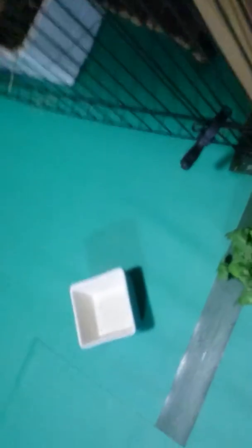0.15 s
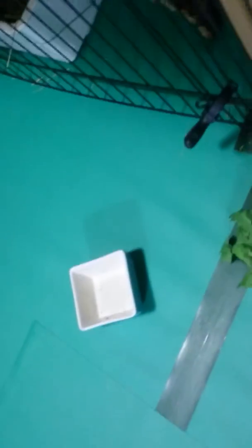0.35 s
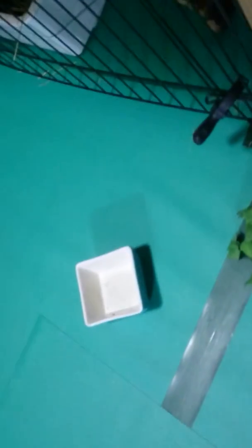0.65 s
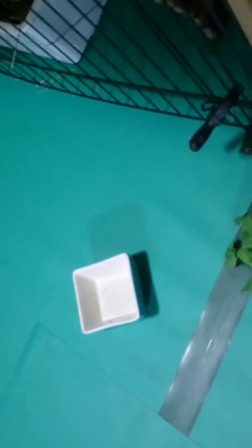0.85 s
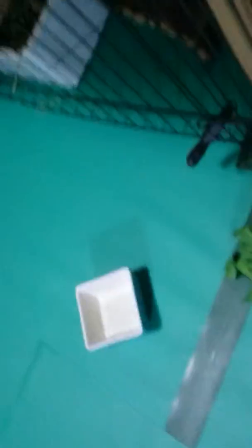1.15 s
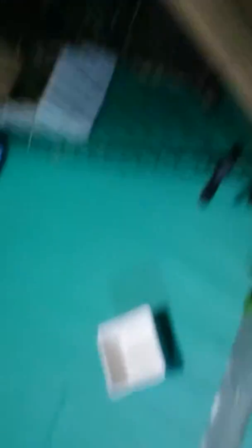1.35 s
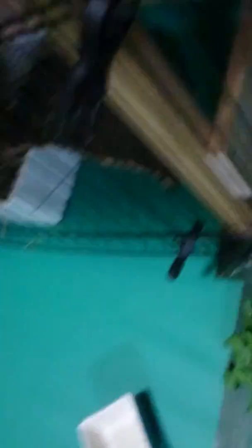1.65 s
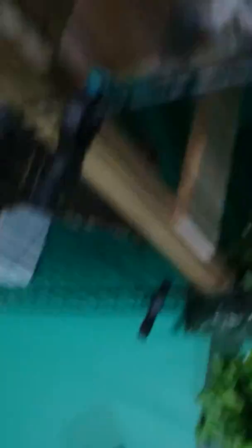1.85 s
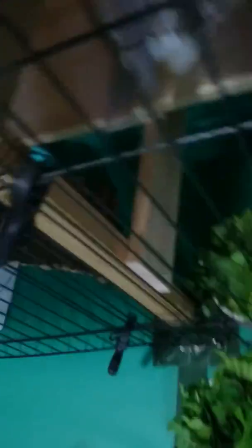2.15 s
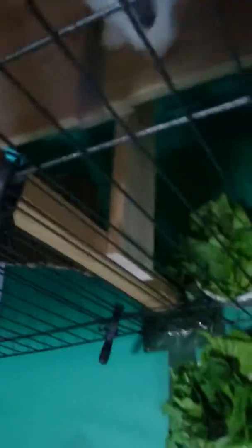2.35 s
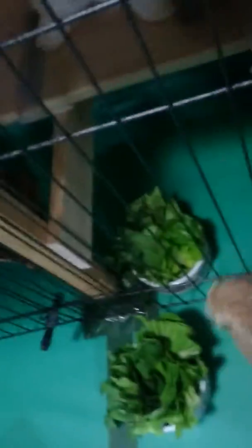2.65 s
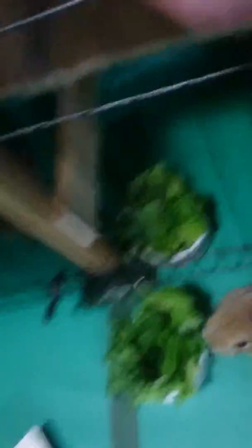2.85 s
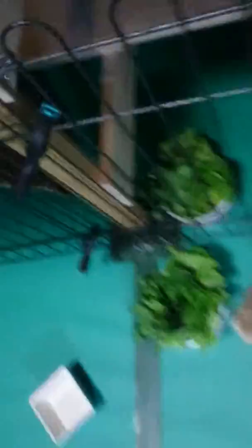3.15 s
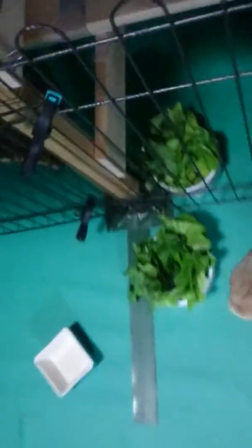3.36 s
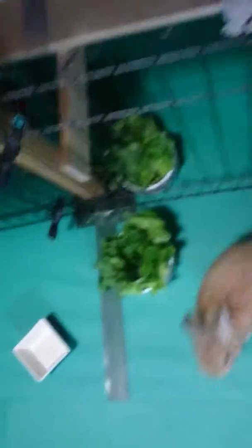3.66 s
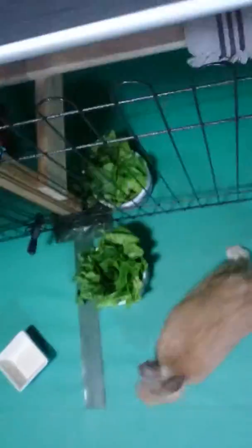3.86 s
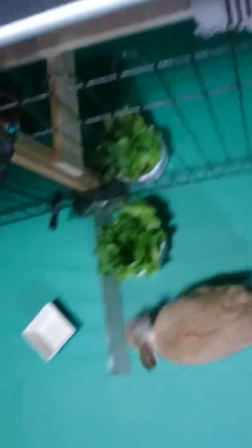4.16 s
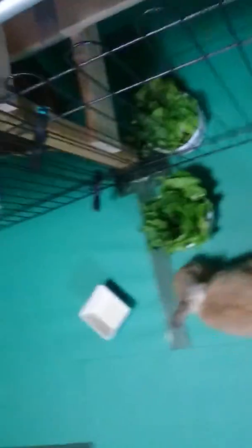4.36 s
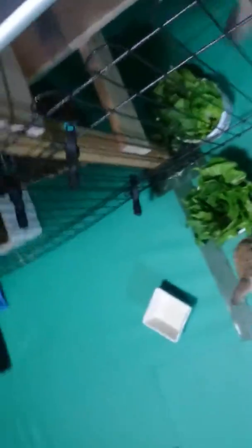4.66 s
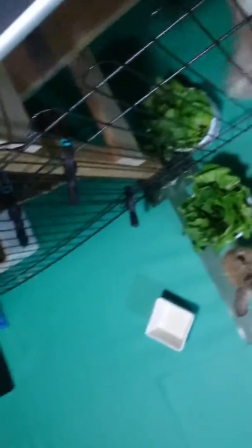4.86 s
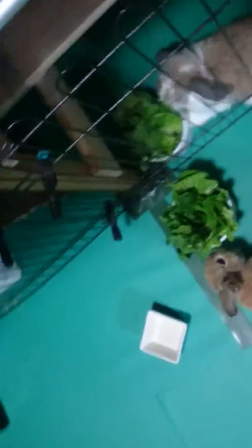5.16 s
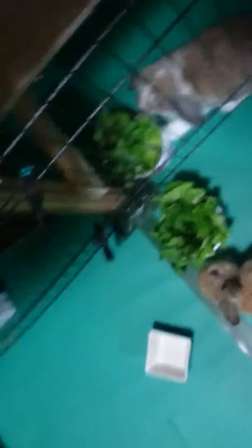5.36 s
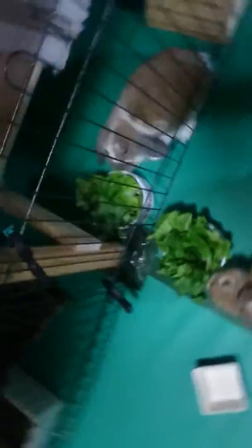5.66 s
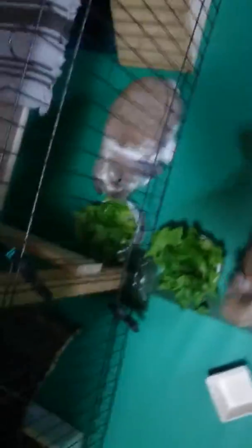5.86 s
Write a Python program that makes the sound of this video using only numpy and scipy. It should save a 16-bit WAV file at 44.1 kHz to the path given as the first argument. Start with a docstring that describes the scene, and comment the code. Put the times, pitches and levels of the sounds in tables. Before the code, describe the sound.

A rustle and one loud hollow plastic knock, then scattered crisp ticks, leafy scuffs and a faint squeak over quiet room hum.

```python
"""A hollow knock, small taps, scuffing paws and leaves, a soft rustle and a thin squeak, over room tone and hum.
Rabbits hop and nibble in a wire pen on a foam mat, heard by a hand-held phone in a quiet room.
Knock, taps, scuffs and thuds are bursts ringing through resonances; rustle is fine grit that swells and fades.
Room tone is shaped noise, hum is sine tones and narrow noise, and the squeak is a gliding sine.
"Shared" sound is alike at both ports (microphone openings); "opposed" sound has its sign flipped at the right."""
import sys
import numpy as np
from scipy import signal
from scipy.fft import rfft, irfft
from scipy.io import wavfile
from scipy.ndimage import uniform_filter1d

SR = 44100
rng = np.random.default_rng(int(sys.argv[2]) if len(sys.argv) > 2 else 0)


def file_out(sig):
    """Save sig as 16-bit WAV at sys.argv[1]."""
    # one column per channel
    cols = np.atleast_2d(sig).T
    # limit, then scale
    lim = np.clip(cols, -1, 1)
    pcm = np.round(lim * 32767).astype(np.int16)
    wavfile.write(sys.argv[1], SR, pcm)


N = 264820
T = np.arange(N) / SR  # time in s
SIDES = np.array([[.5], [-.5]])  # left and right port: times a dB difference, gives each port its half

# course of the background: t/s, mean level of the shared room tone/dB, mean level of the motor's lowest hum/dB
BACKGROUND = [(0.0, -58.5, -59), (0.5, -56.5, -63), (0.7, -55.5, -61), (0.9, -59, -64), (1.8, -57, -63),
              (2.1, -57.5, -67), (3.0, -57.5, -73), (3.56, -59.5, -72), (4.4, -58.5, -69), (5.0, -59, -70),
              (5.6, -59.5, -73), (6.0, -57, -75)]


def undb(db):
    """Turn decibels into a plain gain."""
    return 10 ** (np.asarray(db) / 20)


def unit(x):
    """Scale to an RMS level of 1."""
    return x / np.sqrt(np.mean(x ** 2))


def ring(x, hz, width_hz):
    """One resonance, gain 1 at the centre."""
    b, a = signal.iirpeak(hz, hz / width_hz, fs=SR)
    return signal.lfilter(b, a, x)


def steep(x, hz, width_hz):
    """The same resonance passed twice, so sound away from its centre falls off faster."""
    return ring(ring(x, hz, width_hz), hz, width_hz)


def coloured(points):
    """Noise whose spectrum follows (f/Hz, level/dB) points."""
    hz, db = np.transpose(points)
    f = np.maximum(np.fft.rfftfreq(N, 1 / SR), 1)
    gain = undb(np.interp(np.log(f), np.log(hz), db))
    return irfft(rfft(rng.standard_normal(N)) * gain, N)


def walk(rate):
    """Random levels drawn `rate` times a second and joined by straight ramps; spread a little under 1."""
    k = int(SR / rate)
    steps = np.repeat(rng.standard_normal(N // k + 1), k)
    return uniform_filter1d(steps, k)[:N]


def grit(n, spread_db, grain_s):
    """Dense tiny slips: noise whose size jumps from grain to grain, alike at both ports."""
    k = max(int(grain_s * SR), 1)
    size_db = spread_db * np.minimum(rng.exponential(size=n // k + 1), 3)
    size = np.repeat(undb(size_db), k)[:n]
    return unit(rng.standard_normal((2, n)) * size)


def fade(t, t60):
    """Decay by 60 dB in t60 seconds, starting at t = 0."""
    return 1000. ** (-np.maximum(t, 0) / t60)


def swell(start, rise, hold, t60):
    """Rise, hold and fade over the whole scene."""
    return np.clip((T - start) / rise, 0, 1) * fade(T - start - rise - hold, t60)


def add(out, start, x):
    """Mix a burst into a layer at its start time in s."""
    i = int(start * SR)
    out[:, i:i + x.shape[-1]] += x[..., :N - i]


def ports(shared, opposed):
    """Left port hears the sum, right port the difference."""
    return np.array([shared + opposed, shared - opposed])


def room_tone():
    """Shaped noise of slowly wandering level, one part shared by the ports and one opposed."""
    # spectra of the two parts, only their shape counts: f/Hz, relative level/dB
    shared_shape = [(24, -8), (40, -15), (55, -4), (95, -10.5), (140, -12.5), (240, -15), (400, -10),
                    (620, -8), (780, -3), (1200, 0), (2050, 1), (2700, -6), (3830, -8.5), (4340, -17),
                    (6490, -12), (16000, -38.5)]
    opposed_shape = [(18, -28), (30, -4), (59, -7), (141, -13), (240, -6.5), (300, -8), (364, -4.5),
                     (486, -9.5), (620, -5.5), (2230, -8.5), (4530, -22.5), (6900, -21.5), (16000, -45)]
    start, level_db, _ = np.transpose(BACKGROUND)
    gain = undb(np.interp(T, start, level_db) + 1.84 * walk(7.1))
    shared = gain * unit(coloured(shared_shape))
    opposed = gain * unit(coloured(opposed_shape)) * undb(1.5)
    return ports(shared, opposed)


def hum_lines(turns, lines):
    """Sine tones at multiples of one turning rate, each wavering in level on its own."""
    shared, opposed = np.zeros(N), np.zeros(N)
    for multiple, first_db, last_db, shared_db in lines:
        level_db = first_db + (last_db - first_db) * T / T[-1] + 1.5 * walk(2.68)
        wave = np.sin(2 * np.pi * (multiple * turns + rng.random()))
        tone = undb(level_db) * unit(wave)
        shared = shared + undb(shared_db) * tone
        opposed = opposed + tone
    return ports(shared, opposed)


def mains_hum():
    """Multiples of a steady mains tone, changing slowly as the phone is carried."""
    # multiple of the mains tone, mean opposed level at start/dB, at end/dB, shared part relative to opposed/dB
    mains_lines = [(2, -72, -79, -12), (4, -75, -76.5, -11.5), (6, -79.5, -77, -8), (8, -72, -95, -13),
                   (10, -95, -77, -1)]
    mains_hz = 49.93
    return hum_lines(mains_hz * T, mains_lines)


def motor_hum():
    """A small motor whose speed drifts a little: one opposed low tone and its multiples."""
    # multiple of the motor tone, mean opposed level at start/dB, at end/dB, shared part relative to opposed/dB
    motor_lines = [(2, -80, -76, -15), (4, -84, -76, -14.5), (6, -75.5, -88, -12.5), (8, -86, -80.5, -3)]
    motor_hz = 54.8
    turns = motor_hz * (T + np.cumsum(0.0018 * walk(3)) / SR)
    start, _, level_db = np.transpose(BACKGROUND)
    gain = undb(np.interp(T, start, level_db) + 1.2 * walk(6))
    lowest = gain * unit(np.sin(2 * np.pi * turns))
    return ports(0, lowest) + hum_lines(turns, motor_lines)


def upper_hum():
    """Narrow bands of noise that come and go together."""
    # bands: f/Hz, opposed level before the swells/dB, shared part relative to opposed/dB, width/Hz
    hum_bands = [(383, -72.5, -0.5, 24), (438, -73.5, 4.5, 14), (497, -75.5, 1.5, 30)]
    # swells: t at the end of the rise/s, level relative to the bands' level/dB
    hum_swells = [(0.02, 1), (0.62, -1.5), (1.8, 0), (2.0, -8), (2.46, -5), (2.85, -5), (3.35, -9),
                  (3.8, -3.5), (4.0, -11), (4.92, -14), (5.6, -3)]
    rise_s, fade_t60_s = 0.045, 0.4
    strength = undb(-19.5)  # what is left between swells
    for peak_s, swell_db in hum_swells:
        strength = strength + undb(swell_db) * swell(peak_s - rise_s, rise_s, 0, fade_t60_s)
    shared, opposed = np.zeros(N), np.zeros(N)
    for hz, db, shared_db, width_hz in hum_bands:
        tone = undb(db) * strength * unit(ring(rng.standard_normal(N), hz, width_hz))
        shared = shared + undb(shared_db) * tone
        opposed = opposed + tone
    return ports(shared, opposed)


def crackle(bands):
    """Fine grit in fixed bands, each crackling on its own."""
    layers = [undb(db) * steep(grit(N, 2.34, 0.0048), hz, width_hz) for hz, width_hz, db in bands]
    return unit(sum(layers))


def rustle():
    """Hay and cloth stir over a faint rustle that never stops; body and treble swell separately, powers add."""
    # bands of the body and of the treble: f/Hz, width of one filter pass/Hz, relative level/dB
    body_bands = [(3270, 1500, -2.5), (5500, 1850, -1), (6480, 2000, 0.5), (7870, 3850, -5.5)]
    treble_bands = [(8800, 8100, 0.5), (12700, 3500, -4.5), (15250, 2400, 4)]
    # stirrings: t/s, rise/s, hold/s, fade t60 of the body/s, level of the body/dB,
    # treble relative to body/dB, left minus right/dB
    stirrings = [(0.0, 0.00085, 0.011, 0.49, -54, 1, 3), (0.026, 0.013, .012, .2, -56, 0, 0),
                 (0.076, 0.011, .02, 0.82, -56, 1, 2), (0.145, 0.017, .01, .28, -55.5, -2, 2),
                 (0.223, 0.038, 0.0056, 0.35, -49.5, -5, 4), (0.283, 0.037, .04, 1.08, -50.5, -1.5, 2.5),
                 (0.561, 0.01, 0.0041, 0.51, -53, -4.5, 0), (0.618, .004, 0.011, .6, -54.5, -2, 1),
                 (0.651, 0.021, 0.085, 0.34, -55, 2, 0), (0.918, 0.023, 0.005, 0.19, -63.5, -3, -2),
                 (1.22, 0.22, 0.27, 0.5, -64, -3, 1.5), (1.843, 0.054, 0.62, 1.1, -72, -27, -3),
                 (2.12, 0.2, 0.01, 0.7, -58.5, -1.5, 4), (2.447, 0.008, 0.011, 0.39, -57, -3.5, -1),
                 (2.598, 0.01, 0.011, 0.15, -61, -9, -6), (4.312, 0.014, 0.018, 0.5, -55.5, -12, -3),
                 (4.527, 0.033, 0.072, 0.27, -54, -6.5, -1.5), (4.763, 0.011, 0.018, 0.86, -63, 0.5, -2.5),
                 (4.815, 0.14, 0.01, 0.3, -58, -1.5, -2), (5.04, 0.019, 0.032, 0.45, -62, -4, -2),
                 (5.617, 0.015, 0.013, 0.46, -67.5, 10, -5), (5.754, 0.019, 0.005, 0.25, -57.5, 0.5, -0.5),
                 (5.848, 0.035, 0.019, 0.4, -60, -0.5, 1)]
    treble_fade_share = 0.61  # the treble of a stirring dies sooner
    body = crackle(body_bands)
    treble = crackle(treble_bands)
    # the faint rustle flickers by about 1 dB, its treble lies 13.5 dB lower
    body_power = undb(-67.5 - walk(13)) ** 2
    treble_power = body_power * undb(-13.5 - walk(9)) ** 2
    for start, rise, hold, t60, db, treble_db, pan_db in stirrings:
        port_db = db + SIDES * pan_db
        body_swell = swell(start, rise, hold, t60) * undb(port_db)
        treble_swell = swell(start, rise, hold, treble_fade_share * t60) * undb(port_db + treble_db)
        body_power = body_power + body_swell ** 2
        treble_power = treble_power + treble_swell ** 2
    return np.sqrt(body_power) * body + np.sqrt(treble_power) * treble


def squeak():
    """A thin arching tone: a sine whose pitch glides and trembles slightly, opposed at the ports."""
    # glide: t/s, mean f/Hz, peak level/dB
    glide = [(2.8, 8300, -90), (2.85, 9300, -78), (2.9, 9450, -72), (2.95, 9500, -66), (2.97, 9650, -78),
             (3.0, 9500, -75), (3.03, 9100, -76), (3.06, 8100, -85)]
    start, hz, db = np.transpose(glide)
    pitch_hz = np.interp(T, start, hz) * (1 + .002 * walk(200))
    tone = np.sin(2 * np.pi * np.cumsum(pitch_hz) / SR)
    gain = undb(np.interp(T, start, db, left=-200, right=-200))  # silent before and after
    return ports(0, tone * gain)


def thuds():
    """Knock and hops felt low: soft bumps of noise through one resonance, part opposed and part shared."""
    # t/s, opposed level before the fade/dB, f/Hz, width of one filter pass/Hz, fade t60/s,
    # shared part relative to opposed/dB
    bumps = [(0.608, -46, 527, 90, 0.14, -3), (0.612, -44, 320, 220, 0.18, -13.5),
             (0.79, -55, 378, 60, 0.37, -7), (1.68, -63, 406, 120, 0.34, -1.5),
             (1.781, -52, 170, 200, 0.56, -22), (1.788, -60, 345, 60, 0.28, -9),
             (2.457, -46, 670, 120, 0.2, -5), (2.458, -57, 460, 90, 0.22, -5),
             (3.26, -63.5, 413, 80, 0.4, -2), (4.998, -63, 105, 90, .2, -5), (1.84, -59, 70, 60, 0.27, -8),
             (5.485, -68, 720, 250, 0.12, 10), (5.5, -59.5, 150.4, 151, 0.29, -11),
             (5.615, -58.5, 710, 200, 0.41, -2)]
    out = np.zeros((2, N))
    t = np.arange(int(.4 * SR)) / SR
    for start, db, hz, width_hz, t60, shared_db in bumps:
        shared = unit(steep(rng.standard_normal(len(t)), hz, width_hz))
        opposed = unit(steep(rng.standard_normal(len(t)), hz, width_hz))
        shape = fade(t, t60) * np.clip(t / 0.0056, 0, 1)
        add(out, start, undb(db) * shape * ports(undb(shared_db) * shared, opposed))
    return out


def fibres(n, hz, width_hz):
    """Five neighbouring fibres that slip and ring each on its own, spread around one frequency."""
    places = np.linspace(-.5, .5, num=5) + 0.094 * rng.standard_normal(5)
    fibre_hz = hz + 0.66 * places * width_hz
    return unit(sum(steep(grit(n, 3.6, .0012), f, 0.68 * width_hz) for f in fibre_hz))


def scuffs():
    """Paws and leaves on the mat: stick-slip grit rings mat and leaf while the contact lasts, then fades."""
    # t/s, rise/s, hold/s, fade t60/s, level of the high ring/dB, low ring f/Hz, low width scale/Hz,
    # low relative to high/dB, high ring f/Hz, high width scale/Hz, treble relative to high/dB, left minus right/dB
    contacts = [(1.775, 0.009, 0.02, 0.4, -51, 2680, 2860, 2, 6300, 2780, -8, 1.5),
                (3.054, 0.011, 0.012, 0.2, -52, 2350, 2200, 2, 5700, 2510, -26, 0.5),
                (3.331, 0.0031, 0.012, .1, -53, 3000, 1000, -15, 6130, 1200, -29, -1),
                (4.143, 0.0068, 0.0064, 0.13, -49.5, 3030, 1000, -14, 6630, 3000, -14, -2),
                (4.292, 0.0048, 0.0064, 0.15, -49, 3100, 1000, -7, 6400, 600, -24, -2),
                (4.299, 0.01, 0.01, 0.14, -51, 2060, 600, 1.5, 6100, 3060, -17, -2),
                (4.476, 0.007, 0.045, 0.14, -50.5, 2190, 350, 2.5, 6500, 2220, -19, -5),
                (4.496, 0.017, 0.014, 0.072, -44, 2210, 220, -0.5, 5850, 1400, -16, 0.5),
                (4.479, 0.028, 0.03, 0.14, -59.5, 3070, 1800, 11, 4850, 2010, -5, 3),
                (5.011, 0.011, 0.0044, 0.12, -41, 2150, 2520, -12.5, 7030, 2940, -3, -2),
                (5.148, 0.002, .008, 0.17, -52, 2500, 1000, -25, 7400, 4000, -3, -2),
                (5.188, 0.0037, 0.067, 0.1, -48.5, 3170, 380, 2.5, 5940, 1500, -3.5, 5.5),
                (5.192, 0.0065, 0.017, 0.12, -39, 2180, 600, -14, 5700, 2250, -9.5, -5),
                (5.196, 0.026, 0.049, 0.17, -41.5, 3000, 2220, -3, 6900, 3500, -6.5, -1.5)]
    out = np.zeros((2, N))
    t = np.arange(int(.4 * SR)) / SR
    for (start, rise, hold, t60, db, low_hz, low_width_hz, low_db,
         high_hz, high_width_hz, treble_db, pan_db) in contacts:
        high = fibres(len(t), high_hz, high_width_hz)
        low = undb(low_db) * fibres(len(t), low_hz, low_width_hz)
        treble = undb(treble_db) * fibres(len(t), 10700, 7900)
        shape = np.clip(t / rise, 0, 1) * fade(t - rise - hold, t60)
        add(out, start, shape * (high + low + treble) * undb(db + SIDES * pan_db))
    return out


def taps():
    """Claws and teeth: a click and a short noisy tail through one resonance."""
    # t/s, peak level before panning/dB, ring f/Hz, left minus right/dB, width of one filter pass/Hz,
    # fade t60 of the noise/s
    touches = [(0.428, -40.5, 1490, 4, 1200, 0.12), (1.0422, -33.5, 6400, 0, 3430, 0.0061),
               (1.4548, -43, 3440, 12, 600, 0.025), (1.456, -42, 1870, 6, 800, 0.022),
               (1.61, -44, 3500, 5, 1500, 0.04), (1.706, -45, 5440, 12, 400, 0.066),
               (1.75, -43, 5900, 5, 2620, 0.082), (1.785, -42, 6160, 3, 900, .04),
               (1.803, -47, 5300, 3, 800, .04), (1.79, -40, 3500, 5, 900, .05),
               (1.81, -43, 3900, 7, 700, .04), (1.819, -45, 5900, 3, 900, 0.034),
               (1.784, -49, 1550, -3, 600, .03), (1.797, -51, 2500, 3, 700, .03),
               (1.806, -45, 2800, 3, 600, .03), (1.812, -42, 1500, -4, 900, 0.06),
               (1.827, -49, 2310, 6, 700, .03), (1.833, -46, 1550, -5, 600, .05),
               (1.893, -44.5, 3100, 7, 1200, 0.022), (1.979, -46, 3260, 5, 1500, 0.09),
               (2.2909, -34, 1820, -7, 700, 0.018), (2.2928, -32.5, 1890, -3.5, 600, 0.025),
               (2.2965, -46, 2150, -3, 700, 0.02), (2.294, -44, 1300, -3, 500, 0.034),
               (2.301, -47, 3750, 8, 500, .012), (2.4546, -30, 1870, 9.5, 2290, 0.01),
               (2.458, -32.5, 1300, -2, 1560, 0.12), (2.4586, -35.5, 5760, 14.5, 2470, 0.04),
               (3.0645, -40, 3100, 15, 1500, 0.027), (3.0693, -32.5, 3000, 6, 1500, 0.0064),
               (3.064, -45, 5300, 10, 1200, .015), (3.07, -34.5, 5100, 9, 1000, 0.0091),
               (3.0825, -44, 4600, 10, 1000, .015), (3.066, -53, 1700, -5, 1000, .05),
               (3.0787, -35, 2930, 9, 1500, 0.02), (3.079, -48, 1500, -5, 900, 0.044),
               (3.083, -39, 3520, 9, 1200, 0.025), (3.1592, -41, 2050, -3, 700, 0.04),
               (3.164, -46, 1510, -10, 1200, .12), (3.401, -51, 1480, -6, 920, 0.041),
               (3.915, -44, 1860, -4, 900, 0.085), (4.288, -39, 6560, -6, 1500, 0.014),
               (4.2925, -36, 6600, -10, 600, .025), (4.2975, -38, 6700, -7, 600, .025),
               (4.313, -37.5, 2850, 4, 1200, 0.052), (4.3165, -48, 4000, 5, 4500, 0.0027),
               (4.321, -32, 3940, 3, 4500, 0.0038), (4.367, -51, 6030, -2, 1200, .015),
               (4.4925, -38, 6200, -1, 2500, .012), (5.012, -38.5, 1390, 1, 1200, 0.055),
               (5.017, -33.5, 7000, 2, 6700, 0.02), (5.152, -39, 7900, -.5, 4500, 0.018),
               (5.1823, -24.5, 6400, -4, 1900, 0.034), (5.1855, -28, 6000, 3, 1500, 0.03),
               (5.207, -23.5, 5760, 0, 2500, .02), (5.215, -26, 5200, 5, 2000, 0.023),
               (5.226, -32, 4500, 2, 3500, 0.017), (5.241, -33, 6000, -5, 1500, 0.016),
               (5.258, -37.5, 2180, -4, 500, 0.056), (5.276, -37, 6800, -2, 1500, .02),
               (5.623, -44.5, 8300, -19, 6360, 0.011), (5.8661, -44, 4300, 7, 5600, 0.034)]
    out = np.zeros((2, N))
    t = np.arange(int(.2 * SR)) / SR
    for start, db, hz, pan_db, width_hz, t60 in touches:
        blow = grit(len(t), 2.3, 0.00053) * fade(t, t60)
        blow[0, 0] = blow[1, 4] = undb(5.5)  # the first contact, four samples later at the right port
        burst = steep(blow, hz, width_hz)
        burst = burst / np.abs(burst).max()
        add(out, start, burst * undb(db + SIDES * pan_db))
    return out


def knock():
    """A hollow plastic body is struck and rebounds: fading modes, a crack and an echo from the walls."""
    # blow and rebounds: t/s, level/dB
    blows = [(0.6114, -19), (0.6144, -26), (0.628, -39), (0.645, -40), (0.66, -41.5)]
    # modes, the body's own tones: f/Hz, level relative to the blow/dB, fade t60/s, left minus right/dB
    modes = [(771, -4, 0.072, -6), (864, 3.5, 0.046, -4.5), (956, -5.5, 0.056, -12), (1040, -13, 0.068, 0),
             (1140, -1.5, 0.05, 4), (1316, -11, 0.084, 3), (1490, -8, 0.087, -4), (1600, -7, 0.05, -7),
             (1785, -2.5, 0.037, -4), (1236, -5, 0.044, -5), (1920, -8, 0.13, -4), (1962, 7.5, 0.067, -5.5),
             (2120, -13, 0.043, -3), (3540, -40, 0.043, -3)]
    lag_s, push_s, right_late_s = 0.000086, 0.0011, 0.00079  # between ports; build-up; right port's delay
    out = np.zeros((2, N))
    t = np.arange(int(.5 * SR)) / SR
    push = np.clip((t - (.5 - SIDES) * right_late_s) / push_s, 0, 1)
    contact = np.sin(np.pi / 2 * push) ** 2
    body = np.zeros((2, len(t)))
    for k, (hz, db, t60, pan_db) in enumerate(modes):
        # low modes are shifted further apart between the ports
        phase = 2 * np.pi * hz * (t + SIDES * lag_s) + SIDES * 700 / hz
        body += (-1) ** k * undb(db + SIDES * pan_db) * fade(t, t60) * np.sin(phase)
    for start, blow_db in blows:
        add(out, start, contact * body * undb(blow_db))
    first = blows[0][0]
    crack = unit(steep(grit(len(t), 1.5, 0.003), 2800, 6100))
    add(out, first, undb(-38.5) * fade(t, 0.078) * crack)
    # the walls answer with the same modes, blurred and more even
    echo = sum(undb(0.5 * db) * unit(steep(rng.standard_normal((2, len(t))), hz, 100)) for hz, db, *_ in modes)
    add(out, first, undb(-26) * np.clip(t / 0.0057, 0, 1) * fade(t, 0.21) * unit(echo))
    return out


def scene():
    """Add up all layers, from the background to the knock."""
    background = room_tone() + mains_hum() + motor_hum() + upper_hum()
    return background + rustle() + squeak() + thuds() + scuffs() + taps() + knock()


def record(dry):
    """The phone cuts the deep bass and the top."""
    bass_cut = signal.butter(2, 47, "high", fs=SR, output="sos")
    top_cut = signal.ellip(10, .2, 75, 15800, fs=SR, output="sos")
    return signal.sosfilt(top_cut, signal.sosfilt(bass_cut, dry))


dry = scene()
out = record(dry)
file_out(out)
```